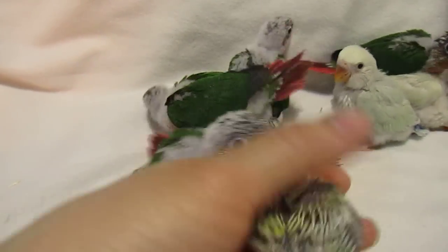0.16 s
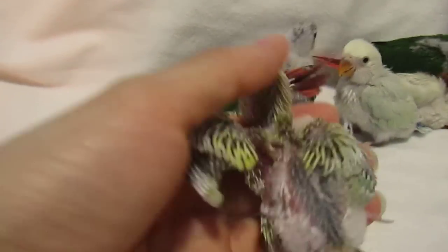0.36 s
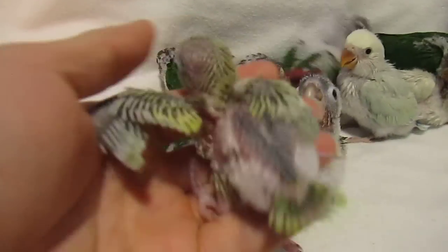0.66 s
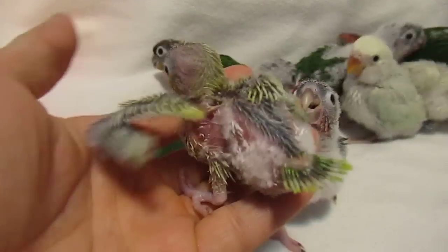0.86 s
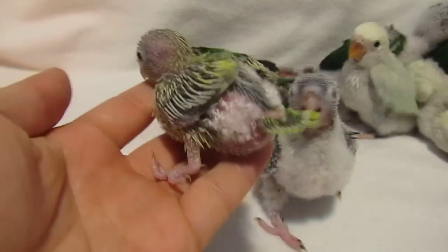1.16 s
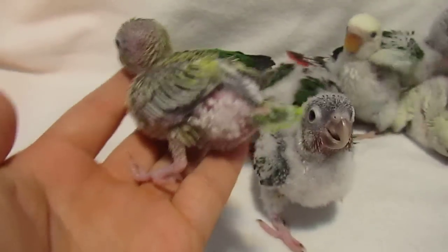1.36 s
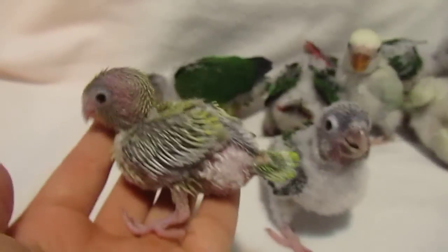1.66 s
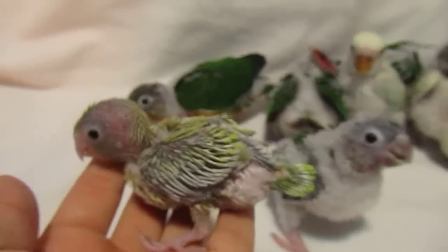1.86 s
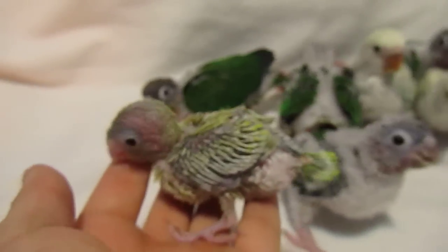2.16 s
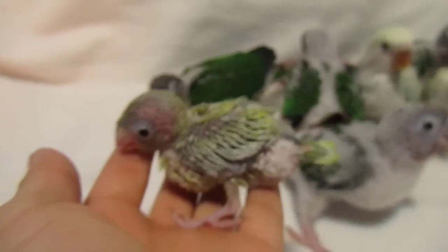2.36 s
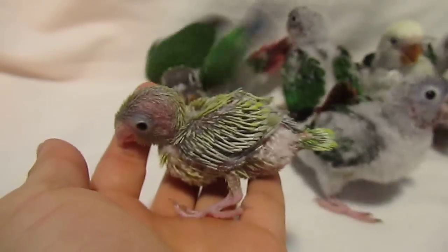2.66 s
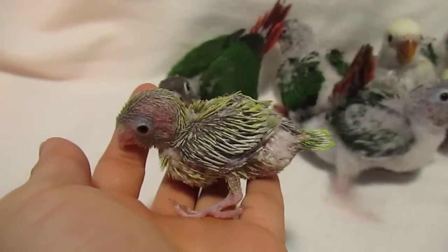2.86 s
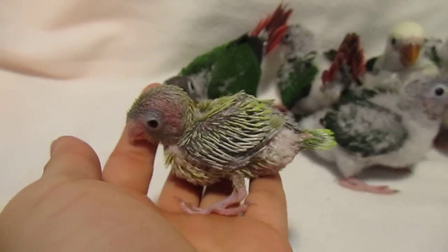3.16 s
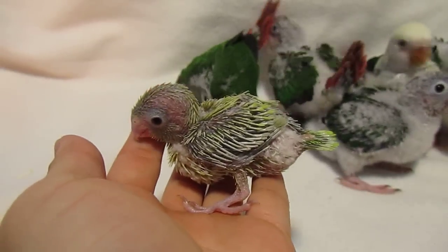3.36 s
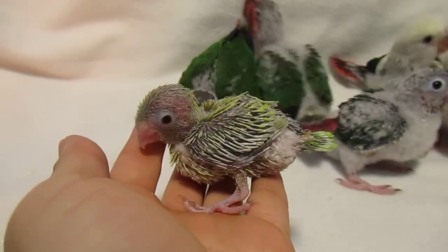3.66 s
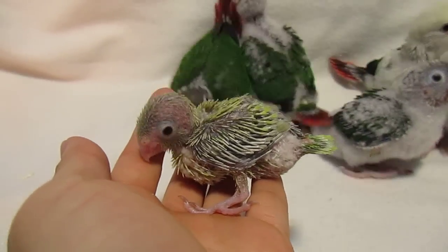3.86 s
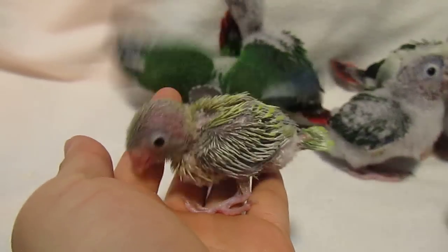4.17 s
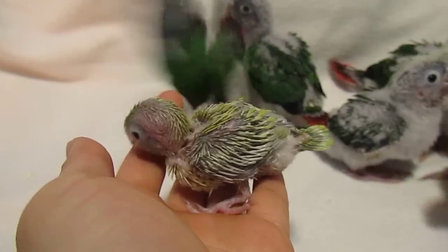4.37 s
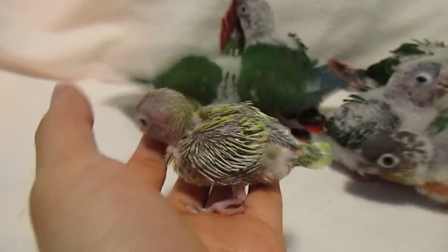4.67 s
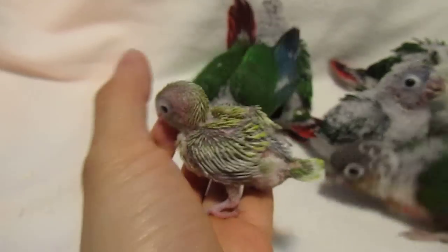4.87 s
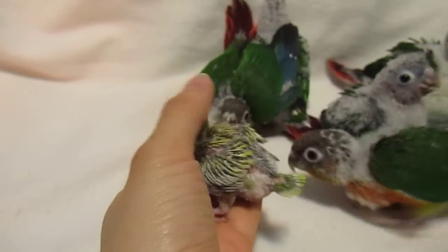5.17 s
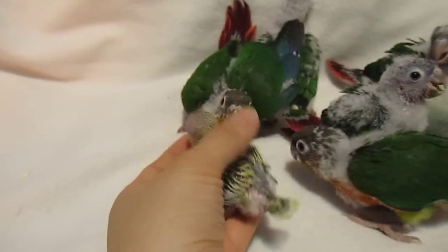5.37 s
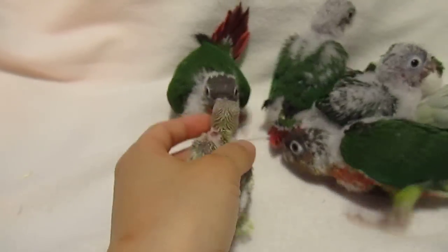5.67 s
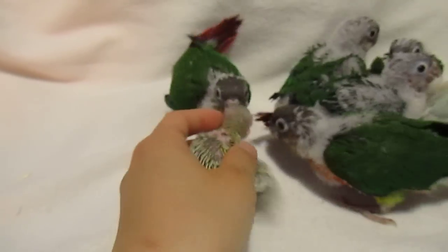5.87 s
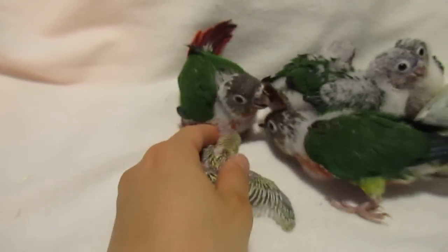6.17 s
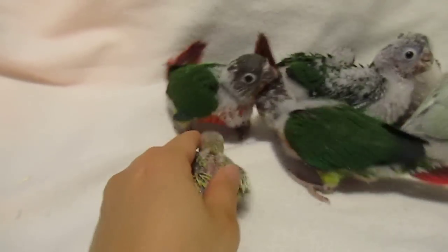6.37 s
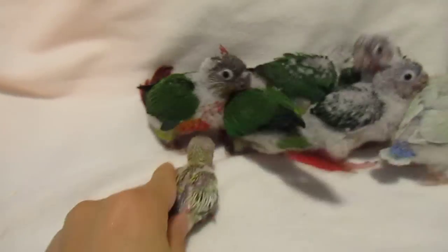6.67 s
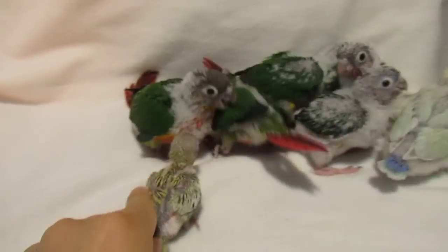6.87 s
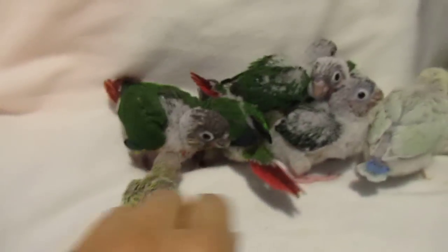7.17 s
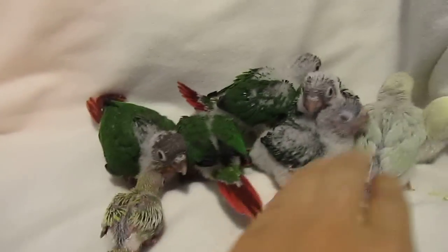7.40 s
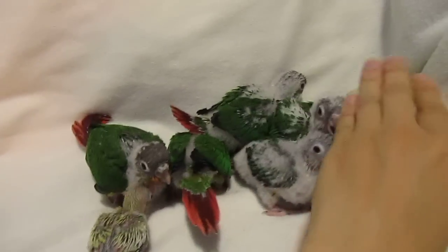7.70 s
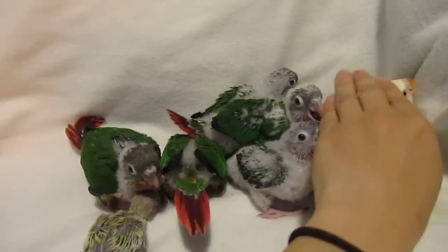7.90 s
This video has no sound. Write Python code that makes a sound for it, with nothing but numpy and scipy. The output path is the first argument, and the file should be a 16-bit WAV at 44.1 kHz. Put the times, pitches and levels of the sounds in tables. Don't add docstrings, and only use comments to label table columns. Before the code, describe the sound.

Several hungry young parrots give short, harsh, raspy squawks in clusters, with thin whimpering squeaks between, close up in a small quiet room.

```python
import sys
import numpy as np
from scipy import signal
from scipy.fft import rfft, irfft, next_fast_len
from scipy.io import wavfile
from scipy.ndimage import uniform_filter1d

SR = 44100
rng = np.random.default_rng(int(sys.argv[2]) if len(sys.argv) > 2 else 0)


def digitize_waveform(pressure):
    field = np.atleast_2d(pressure).T
    bounded = np.clip(field, -1, 1)
    quanta = np.round(bounded * 32767).astype(np.int16)
    wavfile.write(sys.argv[1], SR, quanta)


def voltage_ratio(level):
    return 10 ** (np.asarray(level, float) / 20)


N = 354519
PAD = next_fast_len(N + SR)

# [f/Hz, density/dB]
COMMON_TONE = [(25, -26.5), (60, -7.5), (120, -1), (250, -4), (500, -7), (1400, -9), (3200, -15.5),
               (4100, -25.5), (5500, -16.5), (8000, -19.5), (11000, -26.5), (15000, -46.5)]
OPPOSITE_TONE = [(18, -37), (30, -19.5), (283, -11.5), (1100, -25.5), (1270, -27), (9000, -48),
                 (11700, -87), (19800, -120)]
# [t/s, level/dB]
SHUFFLE = [(0.0, -58.5), (0.11, -56), (0.38, -62), (1.14, -62), (1.299, -65), (1.81, -66.5), (2.48, -62),
           (2.96, -68.5), (4.61, -58.5), (4.95, -56.5), (5.98, -62.5), (6.33, -57), (7.57, -56.5),
           (8.04, -63)]
# [t/s, peak/dB, f/Hz]
FOOT_THUDS = [
    (0.669, -35, 195),
    (2.724, -36, 242.8),
    (3.404, -42, 186.5),
    (3.492, -34, 248),
    (3.637, -41.5, 151),
    (4.784, -38, 335),
    (4.876, -30, 244),
    (5.044, -36, 305),
    (7.169, -36, 187.3),
]
# [t/s, peak/dB, f/Hz]
CLAW_SNAGS = [
    (0.922, -34.5, 1037),
    (3.531, -39, 1040),
    (4.434, -37, 962),
    (4.929, -38, 995),
    (5.003, -49, 1018),
]
# [t/s, peak/dB]
FEATHER_TICKS = [
    (1.9206, -48),
    (1.9605, -53),
    (2.0363, -52.5),
                 (3.4682, -50.5),
    (3.4907, -54),
    (3.5219, -41),
    (3.6764, -46),
                 (4.8744, -45),
    (4.9275, -64),
    (5.0005, -60.5),
]

# [f/Hz, density/dB]
SQUAWK_COLOUR = [(300, -53.5), (620, -21.5), (930, -9.5), (1250, -14), (1800, -11), (2350, -12.5),
                 (2900, -6.5), (3300, -3), (3750, -10.5), (4150, -11), (5100, -5.5), (6700, -7),
                 (8300, -14.5), (10000, -23.5), (13000, -33.5), (16000, -67)]
WHIMPER_COLOUR = [(300, -40.5), (560, -18.5), (900, -6), (1400, -12), (2100, -8), (3200, -5.5), (4100, -15),
                  (5400, -3.5), (7000, -8.5), (9500, -22), (12600, -41), (16000, -52.5)]
# [start t/s, length t/s, level/dB, top f/Hz, hoarseness factor]
RISES = [
    (0.575, .033, -31, 2744, 1.1),
    (2.194, .042, -23.5, 2653, 1.2),
    (3.193, .036, -28, 2770, 1),
    (4.535, .04, -22.5, 2555, 0.93),
    (5.11, 0.058, -25.5, 2598, 1.3),
    (5.79, .042, -30, 2685, 1.1),
    (6.945, .03, -27.5, 2500, .8),
    (7.495, .035, -25.5, 2673, 0.96),
]
DIPS = [
    (0.617, 0.075, -32, 2396, 1.3),
    (2.245, .07, -23, 2515, 1.2),
    (3.24, .075, -25.5, 2518, 1.2),
    (4.587, .08, -21.5, 2268, 1.1),
    (5.18, 0.057, -23, 2517, 1.6),
]
FALLS = [(0.697, .025, -32, 2135, 0.77), (0.932, .022, -20, 2250, 0.79), (1.576, .024, -25, 2190, 0.74),
         (1.665, .025, -30, 2306, 1.1), (2.508, .014, -23.5, 2498, 1.7), (3.323, .022, -25.5, 2288, 0.49),
         (3.765, 0.029, -29, 2394, 1.7), (3.925, 0.044, -27, 2310, 1.4), (4.678, .012, -30, 2090, .6),
         (6.508, .019, -27, 2378, 1.1), (6.987, .013, -21.5, 2584, 0.6), (7.075, .02, -26.5, 2164, 1.05),
         (7.54, .027, -25.5, 2452, 0.54)]
SQUEAKS = [
    (1.278, 0.043, -26.5, 3190, 0.96),
    (3.727, .055, -28.5, 3705, 1.6),
    (3.803, 0.036, -30, 2900, 1.3),
]
YELPS = [
    (0.36, .046, -16, 1328, 0.88),
    (0.453, 0.035, -17.5, 1294, 0.88),
]
# [share of length, share of top pitch, level/dB, roughness 0-1]
RISE = [
    (0, 0.45, -8, 0.6),
    (.35, 0.8, -2, 0.55),
    (.75, 0.82, -1, 0.5),
    (1, 1, 3, 0.05),
]
DIP = [
    (0, 1.05, 2.5, .2),
    (.15, 0.88, 0, 0.3),
    (.36, 0.74, -3, .35),
    (.5, .72, -2.5, .6),
    (.82, .74, 1.5, 0.65),
    (1, .9, 0.5, 0.54),
]
FALL = [
    (0, 1, 2, .3),
    (.45, .87, -2, .33),
    (1, .78, -4, .4),
]
SQUEAK = [
    (0, .58, -5, 0.45),
    (.3, .76, -1, .42),
    (.6, 1, 2, .42),
    (1, .7, -7, 0.7),
]
YELP = [
    (0, 0.92, -5, 0.5),
    (.12, 0.75, -4.5, 0.26),
    (.3, .76, 0.5, 0.4),
    (0.379, .9, 1.5, .6),
    (.46, .97, -3, .7),
    (.58, 1.01, 3, 0.41),
    (.75, 0.95, 0.0, .55),
    (1, 0.51, -7, 0.51),
]

# [start t/s, length t/s, level/dB, top f/Hz, roughness 0-1]
BURSTING = [
    (0.939, .06, -12.5, 1711, 0.6),
    (2.307, .073, -9.5, 1702, .7),
    (2.418, .069, -9, 1721, .66),
    (3.964, .088, -11.5, 1755, 0.6),
    (4.198, .067, -12.5, 1759, 0.7),
    (6.245, 0.07, -13, 1678, 0.6),
    (6.351, 0.059, -11.5, 1742, 0.7),
    (6.407, 0.068, -14.5, 1630, .55),
    (7.566, .062, -7.5, 1845, .65),
]
CLEARING = [(0.057, .07, -9.5, 1833, .55), (0.162, .058, -13, 1786, .6), (1.103, .055, -6.5, 1941, .7),
            (1.207, 0.048, -6.5, 1934, 0.6), (5.408, .047, -8, 2066, .34), (2.638, .056, -9, 1799, .55),
            (4.071, .071, -9.5, 1864, .6), (5.292, 0.044, -11, 1895, .75), (7.786, .069, -7.5, 1773, .65),
            (6.527, .058, -9, 1866, .58), (7.99, 0.053, -16, 1696, 0.7)]
CRACKING = [
    (0.226, .094, -18.5, 1932, 0.55),
    (5.517, .078, -9, 1689, .55),
    (5.635, 0.063, -10, 1740, .46),
    (6.459, 0.048, -13, 1647, 0.6),
    (7.683, 0.063, -9, 1786, .45),
]
DEEP = [
    (-0.035, 0.06, -10.5, 1450, 0.8),
    (1.2, 0.06, -14.5, 920, .6),
    (1.168, 0.05, -17, 1210, .62),
    (1.062, .046, -16, 1230, .5),
    (.27, .045, -19, 1300, 0.6),
    (1.275, 0.04, -24, 810, 0.35),
    (0.125, .035, -26, 1250, .5),
]
LOCKING = [
    (0.997, .068, -7, 1933, .5),
]
STEPPING = [
    (2.522, .098, -9.5, 1871, .6),
]
DEEP_CLEAR = [
    (1.467, 0.07, -19, 1198, 0.28),
    (1.583, 0.07, -18.5, 1228, .36),
]
CLIMBING = [
    (5.238, 0.062, -11.5, 1648, 0.62),
    (5.357, 0.054, -11.5, 1800, .64),
    (5.462, 0.056, -12.5, 1628, 0.5),
    (7.896, .049, -16, 1757, .6),
]
PLAIN = [
    (0.112, .05, -14.5, 1067, .2),
]
BLUNT = [
    (3.852, 0.074, -12.5, 1630, 0.9),
    (6.888, .074, -12.5, 1640, 0.6),
    (6.998, .062, -12.5, 1687, 0.6),
    (7.109, .059, -15, 1648, 0.7),
]
FAR = [
    (5.875, .037, -32.5, 1778, 0.7),
    (6.174, 0.065, -45, 1574, 0.9),
]
PEEPS = [
    (1.392, 0.034, -32, 1532, 0.18),
    (6.666, .024, -23.5, 746, 0.26),
]
# [t/s, left-right level/dB]
HUDDLE = [(0, 0), (.23, 0.96), (1.0, -0.5), (1.3, 0), (1.45, 0.5), (1.7, 1), (2.3, -0.5), (2.5, -.5),
          (2.65, -1), (3.9, 0.5), (4.2, -1.5), (5.3, -1), (5.65, .5), (6.3, -1), (6.9, -0.1), (7.6, 0.3),
          (8, -0.2)]
# [from t/s, beak f/Hz, beak/dB, throat/dB, chest/dB]
POSTURES = [(0, 5120, 4.0, 4, 2), (0.05, 4970, 5.5, 4.5, -2.5), (0.162, 4970, 4.0, 2.5, -5.0),
            (0.225, 5570, 5.5, 4.5, 1), (0.93, 6580, 3.5, 3.5, -1.5), (0.997, 5625, 3.5, -0.5, 0),
            (1.066, 5340.0, 4.0, 3.5, -5), (1.103, 5440, 5, -0.5, -2.5), (1.165, 5204, 6.5, -0.5, -5.5),
            (1.38, 4590, 0, 0.0, 7.5), (1.46, 5860, 4.5, 1.0, -2), (1.58, 6500, 0, 2, 2.5),
            (2.3, 6047, 3, 1.5, 3), (2.41, 6460.0, 3, 1.0, 1), (2.52, 5285, 3.5, 1, -1),
            (2.635, 6580, 5.5, -2.5, -4.5), (3.85, 5510.0, 3.5, 1.5, 4.5), (3.96, 5020, 3.5, 2.5, 1.0),
            (4.07, 5430.0, 2.5, 1.5, 1.0), (4.19, 6460, 3.5, 1.0, -1.5), (5.235, 6290.0, 4.0, -0.5, 3),
            (5.355, 6740, 5, -2, 1), (5.408, 6130, 4.5, -3, -4.5), (5.462, 6200.0, 4.0, -2.5, -0.5),
            (5.517, 4985, 3, -1.5, 3.0), (5.63, 5080, 2.5, -4, 2.0), (6.24, 6720.0, 2, 2.5, 0.0),
            (6.35, 5940.0, 2, 1.0, 0.5), (6.525, 6290.0, 4.5, -2.0, 0.5), (6.885, 6350, -1, -0.5, 2),
            (6.995, 5910, 2.5, -0.5, 3), (7.105, 5660, 3, 0.0, 4), (7.563, 5660, 3.5, 1.0, 0.5),
            (7.68, 5510, 6.5, -5.5, 1.5), (7.785, 5170.0, 5.5, 1.5, -0.5), (7.89, 4730, 6.5, -6.5, -1),
            (7.985, 6570, 5.5, -2, 1)]


def bandpass(x, order, low_hz, high_hz):
    return signal.sosfilt(signal.butter(order, [low_hz, high_hz], "band", fs=SR, output="sos"), x)


def coloured(x, points):
    hz = np.maximum(np.arange(PAD // 2 + 1) * SR / PAD, 1)
    point_hz, point_db = np.transpose(points)
    log_gain = np.log(voltage_ratio(np.interp(np.log(hz), np.log(point_hz), point_db)))
    log_gain = log_gain - .5 * np.log(np.mean(np.exp(2 * log_gain)))
    cepstrum = irfft(log_gain, PAD)
    cepstrum[1:PAD // 2] *= 2
    cepstrum[PAD // 2 + 1:] = 0
    return irfft(rfft(x, PAD) * np.exp(rfft(cepstrum)), PAD)[..., :N]


def drift(rate_hz):
    r = np.exp(-2 * np.pi * rate_hz / SR)
    slow = signal.lfilter([1], [1, -2 * r, r * r], rng.standard_normal(N + SR))[SR:]
    return slow / slow.std()


def room_tone():
    white = rng.standard_normal((4, N))
    shuffle_db = np.interp(np.arange(N) / SR, *np.transpose(SHUFFLE))
    mid_db = -59 + .3 * (shuffle_db - shuffle_db.mean()) + 0.76 * drift(7.4)
    mid = voltage_ratio(mid_db) * coloured(white[0], COMMON_TONE)
    side = voltage_ratio(-52) * coloured(white[1], OPPOSITE_TONE)
    rub = bandpass(white[2:], 2, 90, 420)
    rub = voltage_ratio(shuffle_db - 0.5 + 5.7 * drift(24)) * rub / rub.std()
    return mid + rub[0] + (side + 1.3 * rub[1]) * [[1], [-1]]


def feathers():
    out, s = np.zeros(N), np.arange(int(.008 * SR)) / SR
    ticks = FEATHER_TICKS
    for (at_s, peak_db), puff in zip(ticks, rng.standard_normal((len(ticks), len(s)))):
        out[int(at_s * SR):][:len(s)] += voltage_ratio(peak_db - 3) * puff * np.exp(-s / 0.0015)
    return bandpass(out, 2, 5000, 14000)


def feet(turns=0.93, length_s=.03, rebound_s=.005):
    out, s = np.zeros(N), np.arange(int(length_s * SR)) / SR
    for at_s, peak_db, hz in FOOT_THUDS:
        sharp_swing = np.sin(2 * np.pi * hz * s) ** 3
        wobble = voltage_ratio(peak_db) * sharp_swing * np.exp(-s * hz / turns)
        out[int(at_s * SR):][:len(s)] += wobble
        out[int((at_s + rebound_s) * SR):][:len(s)] += 0.16 * wobble
    return out


def claws():
    out, s = np.zeros(N), np.arange(int(0.0041 * SR)) / SR
    bursts = rng.standard_normal((len(CLAW_SNAGS), len(s)))
    for (at_s, peak_db, hz), snaps in zip(CLAW_SNAGS, bursts):
        snaps = bandpass(snaps, 3, hz / 2, 3400)
        burst = (snaps + 1.1 * np.sin(2 * np.pi * hz * s)) * np.exp(-s / 0.0028)
        out[int(at_s * SR):][:len(s)] += voltage_ratio(peak_db) * burst
    return out


def room(x, t60_s=0.18, level_db=-5.5):
    s = np.arange(SR // 2) / SR
    common, left, right = rng.standard_normal((3, len(s)))
    tail = (1.65 * common + np.array([left, right])) * voltage_ratio(-60 * s / t60_s) * (s > .004)
    near = (2.0 * common[::-1] + np.array([right, left])) * np.exp(-s / 0.0014)
    tail = tail + 4.07 * np.diff(near, prepend=0)
    tail = tail / np.sqrt(np.sum(tail ** 2, axis=1, keepdims=True))
    return voltage_ratio(level_db) * signal.fftconvolve(x[None], tail, axes=1)[:, :N]


def add_note(out, start_s, hz, level_db, rough, half_db, pan_db, beak_db, chance, jitter, shimmer_db):
    n, waver_s, breath = len(hz), .005, .8
    knots = np.arange(0, n + waver_s * SR, waver_s * SR)
    waver = np.interp(np.arange(n), knots, chance[-len(knots):, 3])
    hz = hz * (1 + (.008 + .05 * rough) * waver)
    cycles = np.cumsum(hz) / SR
    at = np.interp(np.arange(1, int(cycles[-1])), cycles, np.arange(n))
    i, k = at.astype(int), np.arange(len(at))
    late, strong, swap, puff = chance[:len(at)].T
    strong = np.clip(.75 * strong + .5 * np.roll(strong, 1) + .3 * np.roll(strong, 2), -2.5, 1)
    puff = np.clip(puff, -1.4, 1.4)
    rough = np.clip(rough[i], 0, 1)
    period = SR / hz[i]
    half = voltage_ratio(np.broadcast_to(half_db, n)[i])
    turn = (-1.) ** (k + np.cumsum(np.abs(swap) > 3 - 2.2 * rough))
    size = (1 + np.minimum(half, .55) * turn) * voltage_ratio(shimmer_db * rough * strong)
    power = uniform_filter1d(size ** 2 * (1 + (breath * rough * puff) ** 2), size=9)
    size = size / np.sqrt(power) * 0.93 * np.sqrt(period) * voltage_ratio(level_db[i])
    catch = np.abs(np.roll(swap, 37)) > 2.9 - 1.5 * rough
    at = at + .45 * period * np.cumsum(catch)
    falter = np.minimum(3 * uniform_filter1d(catch * 1., size=5), 1)
    lumps = 2 * uniform_filter1d(late[::-1], size=5)
    size = size * voltage_ratio(-4.5 * falter + 1.5 * rough + 1.8 * rough * lumps)
    limp = 0.085 * np.minimum(half, 1)
    pulse_at = at + period * (jitter * rough * late + limp * turn)
    flutter_at = at + period * (.5 + .25 * late[::-1])
    at = np.concatenate([pulse_at, flutter_at])
    size = np.concatenate([size, breath * rough * puff * size])
    bass = np.repeat([1, .7], len(i))[:, None]
    sharp_db = .5 * np.broadcast_to(beak_db, n)[i] + 0.55 * (level_db[i] - level_db.max())
    sharp = np.tile(voltage_ratio(sharp_db), 2)[:, None]
    at = np.clip(at + start_s * SR, 8, N - 9)
    samples = at.astype(int)[:, None] + np.arange(-7, 9)
    for side, turn_db in zip(out, [.5 * pan_db, -.5 * pan_db]):
        off = samples - at[:, None] + 0.78 * turn_db
        blunt = np.exp(-.5 * (off / 2.4) ** 2) / (2.4 * np.sqrt(2 * np.pi))
        click = np.sinc(off) * np.cos(off * np.pi / 20) ** 2
        pulse = sharp * (click - blunt) + bass * blunt / sharp
        np.add.at(side, samples, -voltage_ratio(turn_db) * size[:, None] * pulse)


def whimpers():
    out = np.zeros((2, N))
    for notes, course in [(RISES, RISE), (DIPS, DIP), (FALLS, FALL), (SQUEAKS, SQUEAK), (YELPS, YELP)]:
        along, *columns = np.transpose(course)
        chances = rng.standard_normal((len(notes), 300, 4))
        for (start, length, note_db, top_hz, hoarse), chance in zip(notes, chances):
            s = np.arange(0, length, 1 / SR)
            share, level_db, rough = [np.interp(s / length, along, c) for c in columns]
            edge_db = -18 * np.clip(1 - np.minimum(s, length - s) / 0.0022, 0, 1)
            rough = np.clip(hoarse * rough - .1, 0, 1) ** 1.5
            beak_db = 1.5 + .6 * min(note_db + 27, 0) + .45 * max(note_db + 21, 0)
            add_note(out, start, top_hz * share, note_db + level_db + edge_db, rough, -31 + 45 * rough,
                     -.6, beak_db, chance, jitter=.12, shimmer_db=4.5)
    return coloured(out, WHIMPER_COLOUR)


def squawk(rows, attack_s, release_s, early_db, late_db, arch, roughness, half_db, beak_db,
           echo_db=-14, echoes_s=(.00015, 0.000613), top=.55, turns=(.22, .5, .78), opens_s=0.026,
           rise_bend=3.8):
    out, chances = np.zeros((2, N)), rng.standard_normal((len(rows), 300, 4))
    for (start, length, call_db, top_hz, hoarse), chance in zip(rows, chances):
        s = np.arange(max(-start, 0), length, 1 / SR)
        along = s / length
        bend = np.where(along < top, rise_bend, 3.8)
        hz = top_hz * (1 - arch * np.interp(along, [0, top, 1], [1, 0, 1]) ** bend)
        corners = [0, attack_s, max(length - release_s, attack_s + .001), length]
        envelope_db = np.interp(s, corners, [early_db - 12.5, early_db, late_db, late_db - 13.0])
        dome_db = 2 * (1 / 3 - (2 * along - 1) ** 2)
        level_db = call_db + envelope_db + dome_db
        slips = 1 + .2 * np.interp(s, np.arange(20) * .012, chance[-20:, 0])
        rough = np.clip(hoarse * slips * np.interp(along, turns, roughness), 0, 1) ** 1.3
        gape_db = beak_db + max(1.17 * (call_db + 14), -2)
        narrow = np.clip(1 - np.minimum(s / opens_s, (length - s) / 0.0041), 0, 1)
        gape_db = gape_db - 5 * narrow
        rough = rough * (1 - .4 * narrow)
        pan_db = np.interp(start, *np.transpose(HUDDLE))
        echo_s = np.interp(chance[150, 3], [-1.5, 1.5], echoes_s)
        aside_db = 4 * np.sign(chance[150, 2])
        for delay_s, loss_db, turn_db in [(0, 0, 0), (echo_s, echo_db, aside_db)]:
            add_note(out, start + s[0] + delay_s, hz, level_db + loss_db, rough, half_db,
                     pan_db + turn_db, gape_db, chance, jitter=.07, shimmer_db=5.0)
    return out


def squawks():
    calls = squawk(BURSTING, attack_s=0.0097, release_s=0.02, early_db=-2.5, late_db=-2.5, arch=.55,
                   roughness=(.9, .95, 1.15), half_db=-6.0, beak_db=-1.5)
    calls += squawk(CLEARING, attack_s=.02, release_s=0.0083, early_db=-3.0, late_db=-4.0, arch=.55,
                    roughness=(1.3, 1.05, .6), half_db=-6.0, beak_db=-1.3)
    calls += squawk(CRACKING, attack_s=0.012, release_s=0.0072, early_db=-2.0, late_db=-5.5, arch=.55,
                    roughness=(.7, .75, 1.4), half_db=-13.5, beak_db=-0.9, top=.42)
    calls += squawk(DEEP, attack_s=0.013, release_s=0.005, early_db=1.5, late_db=-3.5, arch=.38,
                    roughness=(1.15, .8, 1.05), half_db=1.5, beak_db=-0.5)
    calls += squawk(LOCKING, attack_s=0.016, release_s=0.0056, early_db=-2.4, late_db=-1.5, arch=0.4,
                    roughness=(1.5, 1.4, .1), half_db=-0.5, beak_db=-3.4, top=.75, turns=(.22, .52, .6))
    calls += squawk(STEPPING, attack_s=0.02, release_s=0.007, early_db=-2.7, late_db=-4.0, arch=.5,
                    roughness=(1.05, 1.1, .8), half_db=-7.5, beak_db=-0.5, top=.7, turns=(.22, .55, .68))
    calls += squawk(DEEP_CLEAR, attack_s=0.0099, release_s=0.018, early_db=-0.1, late_db=-1.0, arch=0.33,
                    roughness=(1.1, .8, 1.5), half_db=-0.5, beak_db=3.0,
                    echo_db=-6.0, echoes_s=(0.00034, 0.00036))
    calls += squawk(CLIMBING, attack_s=0.02, release_s=0.0056, early_db=-2.0, late_db=-2.5, arch=.55,
                    roughness=(.9, .9, 1.2), half_db=-6.5, beak_db=-2.0, top=.62, rise_bend=1.9)
    calls += squawk(PLAIN, attack_s=0.007, release_s=.012, early_db=-1.5, late_db=-7.5, arch=.25,
                    roughness=(1.1, .9, 1.1), half_db=-19.5, beak_db=0.5,
                    echo_db=-4.0, echoes_s=(.0003, .00032))
    calls += squawk(BLUNT, attack_s=0.0052, release_s=0.021, early_db=0.5, late_db=-0.5, arch=0.6,
                    roughness=(.85, 1.05, 1.1), half_db=-9.5, beak_db=-1.0, opens_s=0.0033)
    calls += squawk(FAR, attack_s=0.0069, release_s=0.0053, early_db=0.5, late_db=-2.5, arch=0.057,
                    roughness=(.9, 1.1, .8), half_db=-6.5, beak_db=-3.5)
    calls += squawk(PEEPS, attack_s=0.0036, release_s=0.0053, early_db=3.0, late_db=2.0, arch=.12,
                    roughness=(1.05, .5, 2.1), half_db=-34.0, beak_db=-10.0)
    return coloured(calls, SQUAWK_COLOUR)


def resonance(hz, width_hz, db):
    q, g, c = np.tan(np.pi * width_hz / SR), voltage_ratio(db / 2), -2 * np.cos(2 * np.pi * hz / SR)
    return np.array([1 + q * g, c, 1 - q * g, 1 + q / g, c, 1 - q / g]) / (1 + q / g)


def postured(x):
    out, state = np.zeros_like(x), np.zeros((3, 2, 2))
    edges = [0, *[int(row[0] * SR) for row in POSTURES[1:]], N]
    for (_, beak_hz, beak_db, throat_db, chest_db), a, b in zip(POSTURES, edges, edges[1:]):
        beak = resonance(beak_hz, 670, beak_db)
        throat = resonance(3187, 1000, throat_db)
        chest = resonance(905, 430, chest_db)
        out[:, a:b], state = signal.sosfilt([beak, throat, chest], x[:, a:b] + 1e-18, zi=state)
    return out


def direct_path(birds, left_lag_s=8e-6, smear_s_per_khz=7e-5):
    hz = np.arange(PAD // 2 + 1) * SR / PAD
    lag = np.exp(-1j * np.pi * hz * left_lag_s * np.array([[1], [-1]]))
    swing = np.exp(1j * (.9 - np.pi * smear_s_per_khz * hz ** 2 / 1000))
    return irfft(rfft(birds, PAD) * lag * swing, PAD)[:, :N]


def scene():
    birds = postured(squawks()) + whimpers()
    cloth = feet() + claws()
    return direct_path(birds) + room(birds.mean(0)) + cloth + room_tone() + feathers()


def low_pass(x):
    return signal.sosfilt(signal.butter(12, 15800, fs=SR, output="sos"), x)


def record(dry):
    flat = np.clip(dry, -1, 1)
    puff = bandpass(flat ** 8, 2, 15, 119)
    return low_pass(np.clip(flat + voltage_ratio(-26) * puff, -1, 1))


dry = scene()
out = record(dry)
digitize_waveform(out)
```